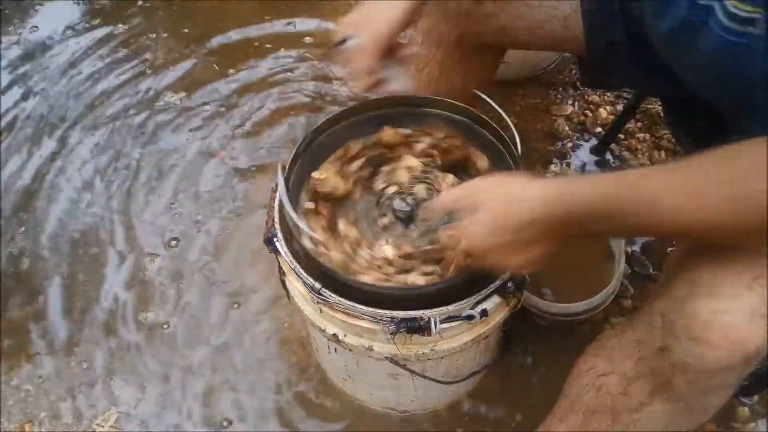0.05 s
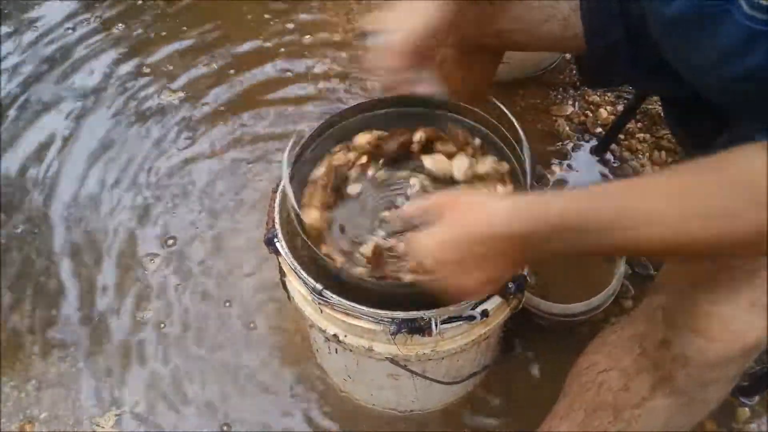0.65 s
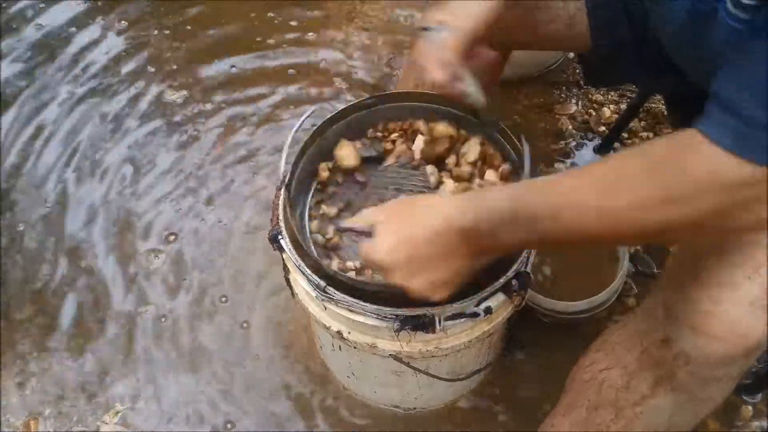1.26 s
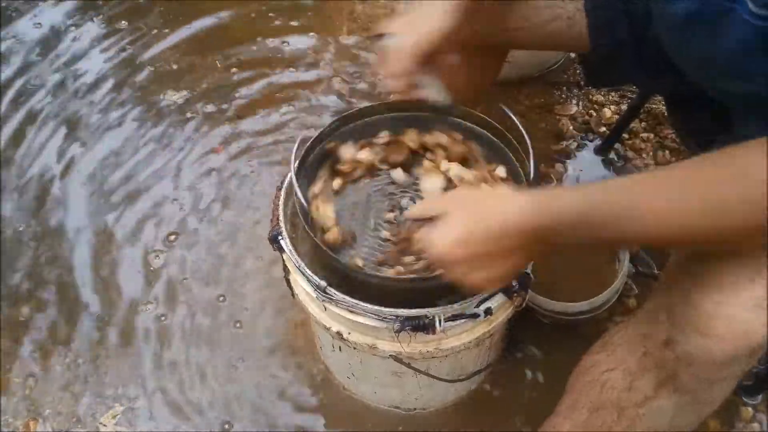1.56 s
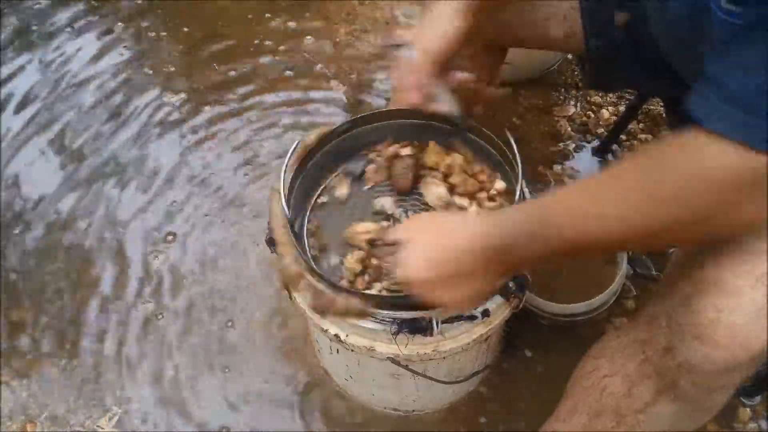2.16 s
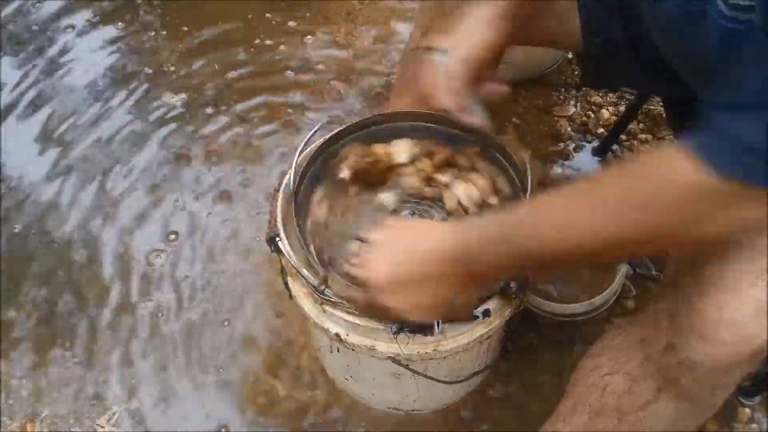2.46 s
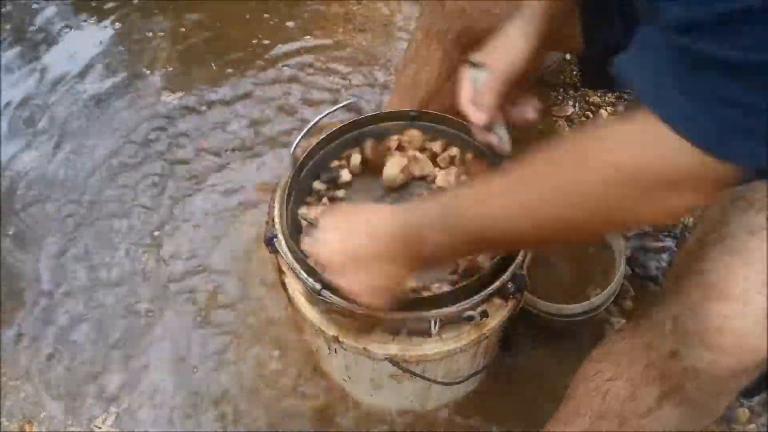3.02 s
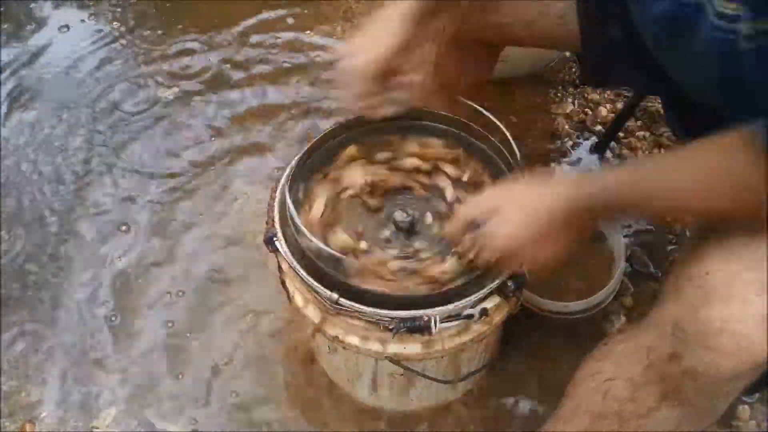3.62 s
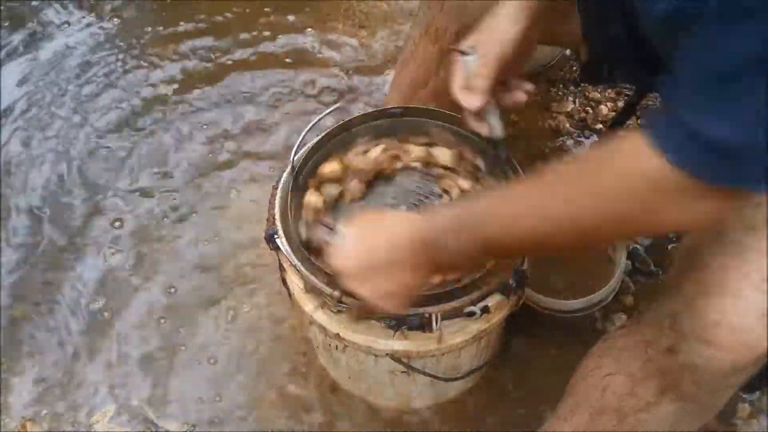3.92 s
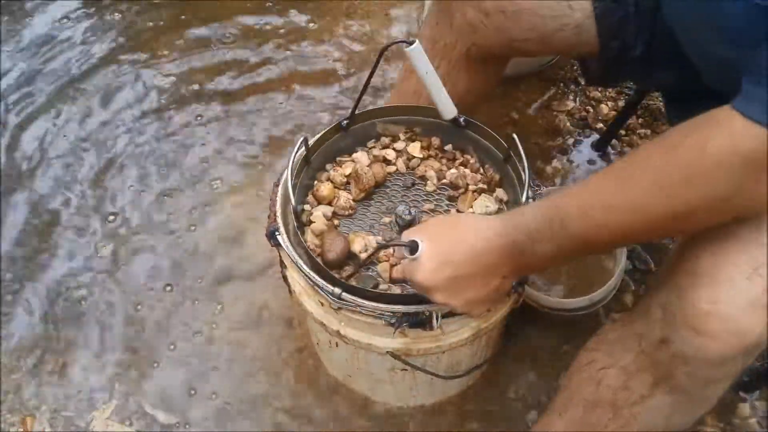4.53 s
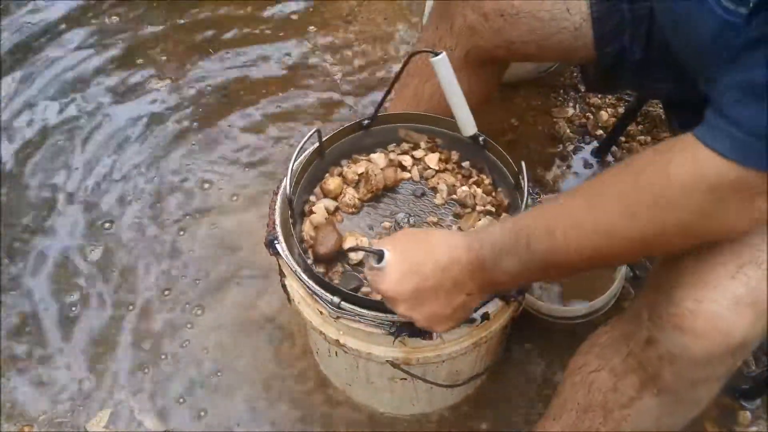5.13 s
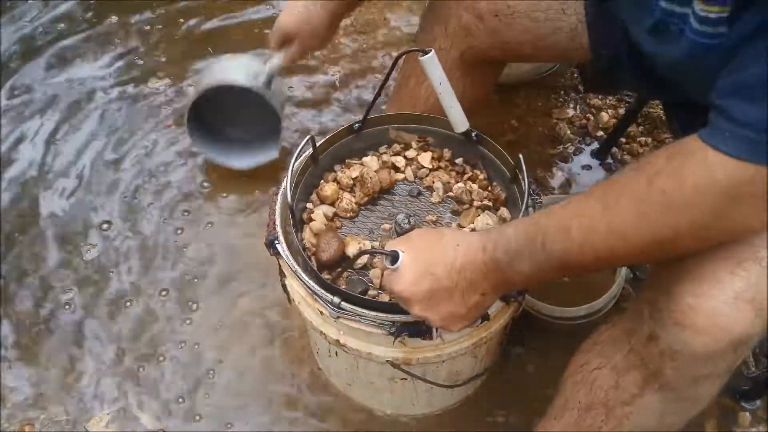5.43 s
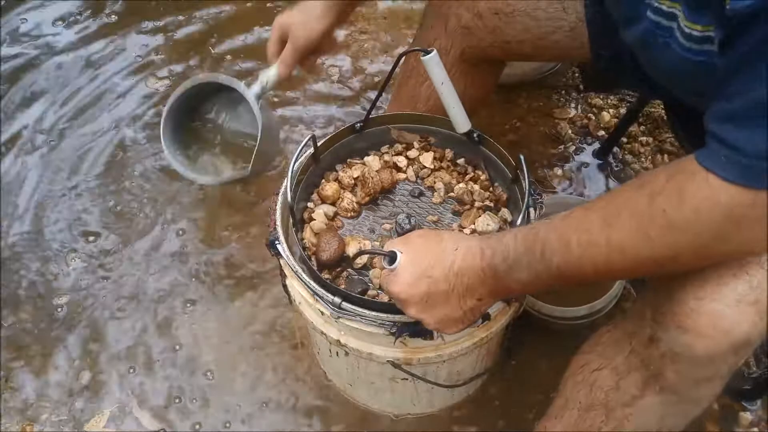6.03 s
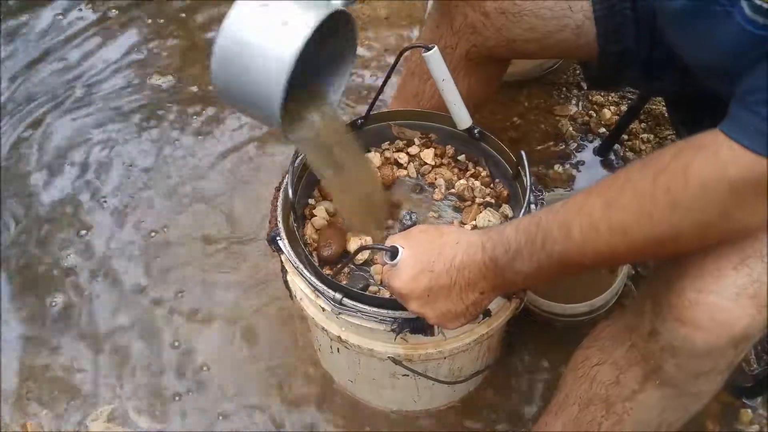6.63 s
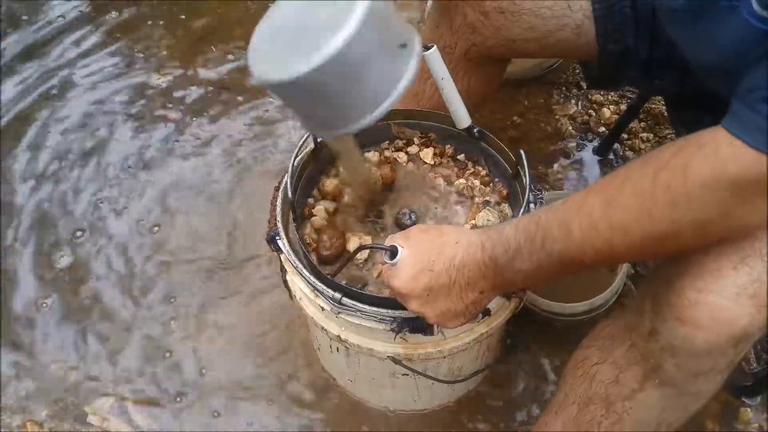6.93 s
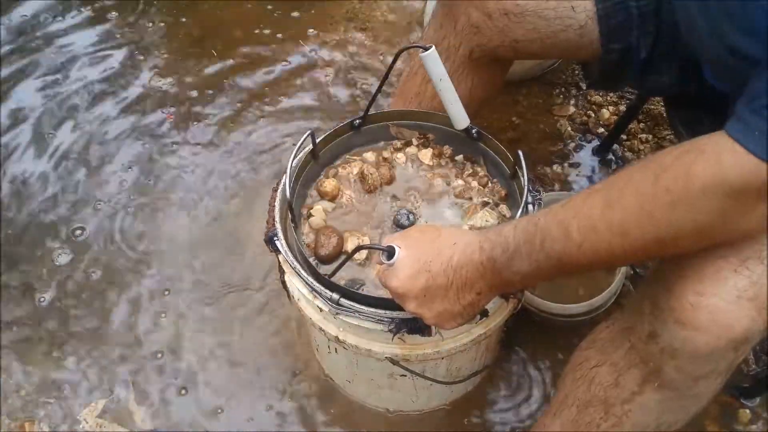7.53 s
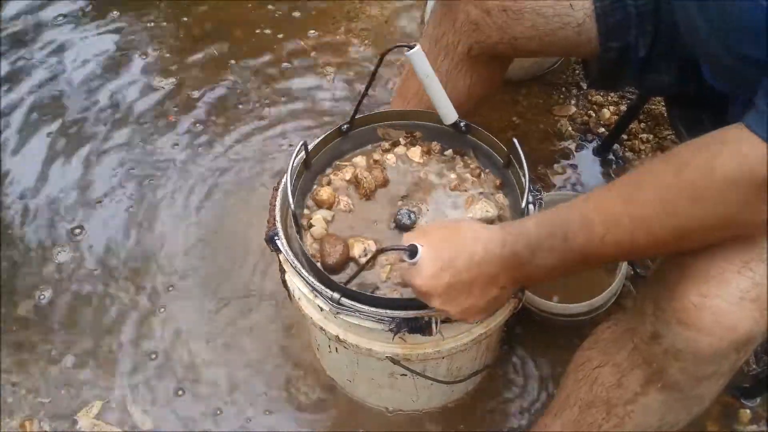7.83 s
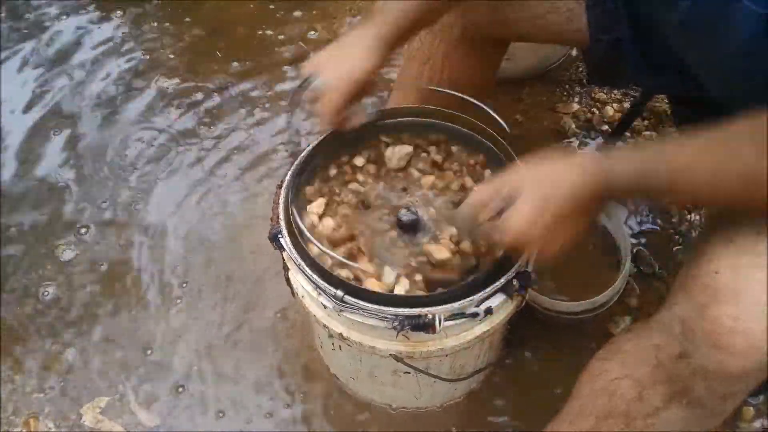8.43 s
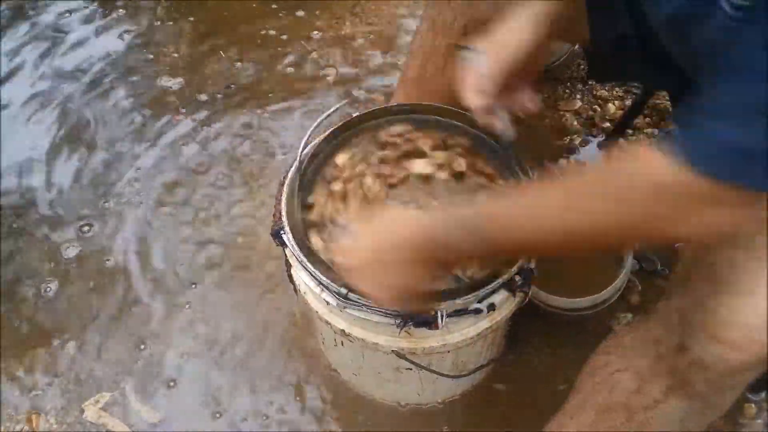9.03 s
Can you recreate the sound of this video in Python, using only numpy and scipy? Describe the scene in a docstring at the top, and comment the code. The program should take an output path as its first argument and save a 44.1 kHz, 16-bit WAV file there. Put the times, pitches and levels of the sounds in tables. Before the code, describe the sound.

Close by, beside a faintly washing creek, stones skitter around a mesh pan in quick pushes while water sloshes and booms softly in the bucket underneath. About halfway the spinning stops, leaving trickles, gritty crackles and light bumps. A small scooping splash leads to a brief pour spattering on the rocks. After a sharp metal scrape and some knocks, the gravel spins again with heavier churning.

```python
"""In a shallow creek, wet gravel is spun in a sieve pan that sits on a bucket of water.
With each push the stones rattle on the mesh while the water churns below. The pan stops and drips.
A saucepan scoops up water and pours it over the stones, the wire handles scrape and clank,
and the spinning starts again. The stones are many tiny clacks; the water is many ringing bubbles."""
import sys
import numpy as np
from scipy import signal
from scipy.fft import next_fast_len
from scipy.io import wavfile
from scipy.ndimage import uniform_filter1d

SR = 44100
rng = np.random.default_rng(int(sys.argv[2]) if len(sys.argv) > 2 else 0)


def master_out(mix):
    """Clip the mix to full scale and print it as 16-bit PCM to the path in sys.argv[1]."""
    frames = np.transpose(np.atleast_2d(mix))
    ceiling = np.clip(frames, -1, 1)
    pcm = np.round(ceiling * 32767).astype(np.int16)
    wavfile.write(sys.argv[1], SR, pcm)


N = 408807
TIME = np.arange(N) / SR

# The peaky treble tone shared by the rattle, pour, drips and scrapes: f/Hz, level/dB
BRIGHT_TONE = [(1200, -27.5), (2400, -24), (3500, -22.5), (4500, -11), (5400, -19), (6200, -9), (6900, -10),
               (7500, -4.5), (7800, -10), (8150, -1), (8550, -1.5), (9100, -11), (9900, -12), (13200, -21),
               (16000, -23.5)]
# The tone of the dull pan and of the deep water: f/Hz, level/dB
PAN = [(50, -23), (150, -20), (400, -8), (730, 0), (860, -7.5), (1020, 5), (1250, -5.5), (1700, -2),
       (2200, -12), (3200, -7), (7000, -48.5)]
WATER = [(40, -17), (140, -23.5), (220, -11.5), (330, 3), (500, 1.5), (750, -5.5), (1500, -47.5)]
# Pushes of the hand that spin the pan: start/s, length/s, level/dB
PUSHES = [(-0.072, 0.04, -10), (0.087, 0.36, -16.5), (0.479, 0.4, -17.5), (0.893, 0.44, -17.5),
          (1.354, 0.38, -18), (1.834, 0.14, -20), (2.072, 0.022, -11.5), (2.218, 0.2, -18),
          (2.446, 0.13, -14), (2.674, 0.14, -13.5), (2.894, 0.15, -13), (3.139, 0.19, -14),
          (3.381, 0.13, -13.5), (3.616, 0.17, -15), (3.874, 0.13, -14), (4.112, 0.1, -24),
          (8.375, 0.066, -14.5), (8.537, 0.13, -10), (8.796, 0.16, -11.5), (9.051, 0.075, -9)]
# The pan bumping the bucket: t/s, level/dB, f/Hz, t60/s (t60 is the time to fade by 60 dB)
KNOCKS = [(3.42, -11, 750, 0.05), (3.845, -5, 750, 0.052), (4.276, -20.5, 1200, 0.09),
          (4.321, -20, 1600, 0.06), (4.402, -28, 1500, 0.04), (4.596, -16.5, 1700, 0.085),
          (4.659, -13, 1500, 0.08), (4.841, -25.5, 1100, 0.03), (4.933, -30.5, 1500, 0.051),
          (5.288, -34, 735, 0.092), (7.969, -23.5, 850, 0.12), (7.969, -30, 160, 0.11),
          (8.058, -21, 790, 0.14), (8.143, -12, 870, 0.079), (8.148, -26.5, 200, 0.1),
          (8.512, -4.5, 1170, 0.041), (8.976, -7.5, 795, 0.11), (9.0, -6, 810, 0.12)]
FLOODED_S = 7.33  # from here on, the poured water covers the mesh


def amp(db):
    """Turns decibels into a gain to multiply by."""
    return 10 ** (np.asarray(db) / 20)


def unit(x):
    """Scales a sound to an average power of 1."""
    return x / np.sqrt(np.mean(x ** 2) + 1e-20)


def add(mix, s, sound):
    """Mixes a sound in, starting at s seconds."""
    part = mix[max(round(s * SR), 0):][:len(sound)]
    part += sound[:len(part)]


def envelope(start, rise_s, length_s, fade_db_per_s):
    """A gain that rises from the start, then fades once the length has passed."""
    t = TIME - start
    return np.clip(t / rise_s, 0, 1) * amp(-fade_db_per_s * np.maximum(t - length_s, 0))


def swell(crest, rise_db_per_s, fall_db_per_s):
    """A gain that climbs to 1 at the crest and falls away."""
    return amp(-np.maximum(rise_db_per_s * (crest - TIME), fall_db_per_s * (TIME - crest)))


def stroke(rise_s, t60):
    """A short slide: the times around its peak, and how hard it presses at each."""
    t = np.arange(-SR // 8, SR // 2) / SR
    return t, np.exp(np.minimum(t, 0) / rise_s - np.log(1000) * np.maximum(t, 0) / t60)


def colour(x, spectrum):
    """Gives a sound the tone in a table, at power 1, while clicks keep their sharp start."""
    hz, db = np.transpose(spectrum)
    grid_hz = abs(np.fft.fftfreq(4096, 1 / SR))
    log_gain = np.log(amp(np.interp(np.log1p(grid_hz), np.log1p(hz), db)))
    taps = np.fft.ifft(np.exp(np.conj(signal.hilbert(log_gain)))).real  # a minimum-phase filter
    return unit(signal.oaconvolve(x, taps[:len(taps) // 2])[:len(x)])


def ring(x, hz, width_hz):
    """Makes a sound ring at one pitch; the narrower the width, the longer it rings."""
    sharpness = hz / min(width_hz, .3 * SR)
    return signal.lfilter(*signal.iirpeak(min(hz, .45 * SR), sharpness, SR), x)


def waver(x, depth_hz, every_s):
    """Lets the pitch of a sound wander at random."""
    times = np.arange(0, N / SR + every_s, every_s)
    shift_hz = np.interp(TIME, times, rng.standard_normal(1000)[:len(times)]) * depth_hz
    return (signal.hilbert(x, next_fast_len(N))[:N] * np.exp(2j * np.pi * np.cumsum(shift_hz) / SR)).real


def soften(x):
    """Water cushions the start of a sound."""
    return x * (1 - np.exp(-np.arange(len(x)) / (.002 * SR)))


def clicks(per_s, spread_db):
    """Clicks at random moments, mostly small and a few large."""
    place, chance = rng.random((6000, 2))[:int(per_s * N / SR)].T
    out = np.zeros(N)
    out[(place * N).astype(int)] = amp(spread_db * np.minimum(-np.log(chance), 3.6))
    return out


def clack(hz, width, t60, scatter):
    """One hit: a click scatters off nearby stones and rings what it struck. Width is a share of hz."""
    t = np.arange(int(t60 * SR) + 64) / SR
    blow = scatter * rng.standard_normal(SR // 2)[:len(t)] * amp(-60 * t / t60)
    blow[0] += 1
    return ring(blow, hz, width * hz)


def shower(low_hz, high_hz, per_s, spread_db, width, t60, scatter, count=14):
    """Many clacks of many pitches, each with a short noisy tail."""
    out = np.zeros(N)
    decay = amp(-120 / (t60 * SR))  # share of a tail's power left after one sample
    for hz in np.geomspace(low_hz, high_hz, count):
        hits = clicks(per_s / count, spread_db)
        tails = np.sqrt(signal.lfilter([1], [1, -decay], hits ** 2 + 1e-12)) * rng.standard_normal(N)
        out += np.sqrt(hz) * unit(ring(hits + scatter * tails, hz, width * hz))
    return unit(out)


def bubble(hz, t60, rise):
    """A fading tone whose pitch climbs, as a bubble's does when it nears the surface."""
    t = np.arange(int(t60 * SR) + 8) / SR
    tone = np.sin(2 * np.pi * hz * t * (1 + rise * t / t60))
    return tone * amp(-60 * t / t60) * (1 - np.exp(-t * hz))


def bubbling(low_hz, high_hz, per_s, spread_db, cycles, count=30):
    """Many bubbles of many sizes; the big, low ones ring longest."""
    out = np.zeros(N)
    for hz in np.geomspace(low_hz, high_hz, count):
        births = clicks(per_s / count, spread_db)
        out += np.sqrt(hz) * signal.oaconvolve(births, bubble(hz, cycles / hz, rise=0.081))[:N]
    return unit(out)


def body(x):
    """The pan on its bucket answers a blow by ringing at several pitches."""
    # Those pitches: f/Hz, width/Hz, level/dB
    resonances = [(350, 110, 1), (1145, 280, -1.5), (1538, 100, -6.5), (2186, 110, -4), (2950, 360, 0),
                  (4520, 420, 3)]
    return sum(amp(db) * ring(x, hz, width) for hz, width, db in resonances)


def creek():
    """Shallow water makes a faint, steady wash."""
    # Its tone: f/Hz, level/dB
    wash = [(25, -19), (68, 2.5), (130, -8.5), (520, -15), (820, -4), (2000, -13), (3500, -24), (4600, 0.5),
            (5200, -11.5), (8300, -7), (10500, -19.5)]
    return amp(-59.5) * colour(rng.standard_normal(N), wash)


def bank_echo(near):
    """The creek banks scatter a little of the sound back."""
    t = np.arange(SR // 2) / SR
    banks = rng.standard_normal(len(t)) * amp(-60 * t / .24) * (t > .004)
    return amp(-19) * signal.oaconvolve(near, banks / np.linalg.norm(banks))[:N]


def ringing(sag=.04):
    """Thin metal rings after a touch, starting a little high and sinking in pitch."""
    # The saucepan (picked up, dipped, tipped), then a wire handle: t/s, level/dB, f/Hz, t60/s
    touches = [(5.292, -46, 1190, 0.35), (5.674, -28.5, 3120, 0.078), (6.419, -53.5, 1215, 2.8),
               (8.145, -29, 3460, 0.16)]
    out, t = np.zeros(N), np.arange(SR // 2) / SR
    for s, db, hz, t60 in touches:
        fade = amp(-60 * t / t60)
        pitch = hz * (1 + sag * np.sqrt(fade))
        add(out, s, amp(db) * fade * np.sin(2 * np.pi * np.cumsum(pitch) / SR))
    return out


def squeaking(at_s=4.803, pitch_hz=1178, jitter=.012):
    """A handle sticks and slips in its loop: a quick, unsteady run of jolts with grit in it."""
    out = np.zeros(N)
    t, pressure = stroke(rise_s=.008, t60=.05)
    hz = pitch_hz * (1 + jitter * unit(uniform_filter1d(rng.standard_normal(len(t)), 40)))
    jolts = unit(sum(np.cos(2 * np.pi * k * np.cumsum(hz) / SR) for k in range(2, 10)))
    rough = jolts + .8 * rng.standard_normal(len(t))
    add(out, at_s + t[0], amp(-27.5) * pressure * (colour(rough, BRIGHT_TONE) + jolts / 3))
    return out


def scooping():
    """The saucepan splashes out of the creek in a burst of tiny bubbles."""
    splash = amp(-38) * envelope(start=6.137, rise_s=0.011, length_s=0.011, fade_db_per_s=147)
    return splash * bubbling(2820, 9000, per_s=1800, spread_db=4, cycles=24)


def pouring():
    """Poured water spatters on the stones, froths, and makes the air in the bucket ring."""
    spatter = shower(417, 10100, per_s=6200, spread_db=7.5, width=0.16, t60=0.039, scatter=0.17)
    froth = amp(-10) * bubbling(850, 7700, per_s=1100, spread_db=0.5, cycles=17)
    air = amp(-9.5) * unit(ring(ring(spatter, 707, 100), 707, 100))
    dull = amp(-17) * colour(spatter, PAN) + amp(-21) * colour(spatter, WATER)
    stream = amp(-39.5) * envelope(start=6.82, rise_s=.04, length_s=0.45, fade_db_per_s=260)
    return stream * (colour(spatter, BRIGHT_TONE) + dull + froth + air)


def draining(stop_s=4.25):
    """The stopped pan drains: wet grit crackles, drops raise small bubbles, and the bucket gurgles."""
    grit = shower(1600, 7900, per_s=520, spread_db=4.2, width=1.0, t60=0.027, scatter=0.3)
    snaps = bubbling(3650, 10400, per_s=130, spread_db=7.5, cycles=65)
    drips = bubbling(1170, 3250, per_s=61, spread_db=5.0, cycles=60)
    gurgle = bubbling(121, 1440, per_s=300, spread_db=5, cycles=15)
    emptying = envelope(stop_s, rise_s=.08, length_s=FLOODED_S - stop_s, fade_db_per_s=84)
    rush = envelope(stop_s, rise_s=.08, length_s=0, fade_db_per_s=14)
    trickle, stray_drops = amp(-54.5), amp(-11)  # faint stray drops fall the whole time
    flow = emptying * (amp(-37.5) * rush + trickle)
    # Each bump shakes some grit loose.
    shaken = sum(amp(db - 19.5) * envelope(s, 0.0088, 0, fade_db_per_s=125) for s, db, _, _ in KNOCKS)
    crackle = amp(-4) * colour(grit, BRIGHT_TONE) + amp(-11) * colour(grit, PAN)
    drops = (flow + stray_drops * trickle) * amp(-5.5) * colour(snaps, BRIGHT_TONE)
    drops += (emptying + stray_drops) * amp(-60) * drips
    return (flow + shaken) * crackle + drops + amp(-49) * rush ** 1.5 * colour(gurgle, WATER)


def ticking():
    """Single stones settle and drops land, each with a sharp tick."""
    # The ticks: t/s, level/dB, f/Hz
    ticks = [(2.0146, -8, 8800), (4.3172, -5, 8100), (4.402, -17.5, 7500), (4.57, -18, 6500),
             (4.879, -26.5, 6800), (5.1575, -18, 6560), (5.2952, -17, 8750), (5.674, -11, 7440),
             (5.736, -22.5, 6600), (5.8451, -21.5, 5870), (6.1492, -28, 3560), (6.367, -23.5, 4550),
             (6.621, -29, 6560), (6.77, -26.5, 4500), (7.1386, -16.5, 8100), (7.361, -29, 6250),
             (7.412, -26.5, 8040), (8.3696, -11, 6730)]
    out = np.zeros(N)
    for s, db, hz in ticks:
        tick = ring(clack(hz, width=.2, t60=.022, scatter=.2), hz, hz)
        add(out, s, amp(db) * tick / abs(tick).max())
    return out


def hollow_tones():
    """Short hollow tones: booms of the bucket and single bubbles, each with a faint burst of noise."""
    # The tones: t/s, level/dB, f/Hz, t60/s
    tones = [(0.83, -18, 697, 0.12), (0.855, -17.5, 1050, 0.15), (1.57, -16.5, 736, 0.097),
             (1.72, -18.5, 756, 0.11), (2.54, -9.5, 420, 0.039), (2.58, -12, 322, 0.046),
             (2.818, -7, 322, 0.061), (4.492, -25, 590, 0.2), (4.774, -31, 2050, 0.057),
             (5.725, -32, 2110, 0.064), (5.817, -40, 456, 0.12), (6.011, -28.5, 652, 0.084),
             (6.594, -24.5, 763, 0.09), (9.005, -7, 796, 0.093), (9.22, -9, 458, 0.044)]
    out = np.zeros(N)
    for s, db, hz, t60 in tones:
        add(out, s, amp(db) * soften(bubble(hz, t60, rise=0.104)))
        add(out, s, amp(db - 20) * soften(clack(hz, width=1.5, t60=t60, scatter=.8)))
    return out


def knocking():
    """The pan bumps the bucket: a dull thud, and both of them ring."""
    out = np.zeros(N)
    for s, db, hz, t60 in KNOCKS:
        blow = clack(hz, width=0.85, t60=t60, scatter=0.93)
        knock = soften(ring(blow, hz, 2 * hz) + amp(4) * body(blow))
        add(out, s, amp(db) * knock / abs(knock).max())
    return out


def scraping():
    """The handles scrape in their loops, which leaves the steel wire ringing."""
    # The scrapes: t/s, level/dB, rise/s, t60/s, ring compared with scrape/dB
    scrapes = [(8.06, -9, 0.0029, 0.059, -13), (8.145, -24.5, 0.011, 0.093, -0.5),
               (8.21, -35, .002, 0.12, 6), (8.52, -15.5, 0.0053, 0.02, -17)]
    # The pitches of the wire: f/Hz, level/dB
    wire = [(5280, -6), (6340, 4), (7090, 9), (7280, 2), (7520, 5), (8500, 0), (8900, 2)]
    out = np.zeros(N)
    for s, db, rise, t60, ring_db in scrapes:
        t, pressure = stroke(rise, t60)
        slips = pressure * colour(rng.standard_normal(len(t)), BRIGHT_TONE)
        jolts = pressure * rng.standard_normal(len(t))
        steel = sum(amp(level) * ring(jolts, hz, width_hz=16) for hz, level in wire)
        add(out, s + t[0], amp(db) * (slips + amp(ring_db) * slips.std() * unit(steel)))
    return out


def grinding():
    """The pan grinds on the bucket's rim as it starts to turn."""
    # The rubs: t/s, level/dB, rise/s, t60/s, f/Hz
    grinds = [(8.374, -29.5, .011, .06, 1850), (8.485, -23, .025, .2, 1100)]
    out = np.zeros(N)
    for s, db, rise, t60, hz in grinds:
        t, pressure = stroke(rise, t60)
        rub = ring(rng.standard_normal(len(t)), hz, hz / 4)
        add(out, s + t[0], amp(db) * pressure * unit(body(rub)))
    return out


def sloshing(rattle):
    """Water churns along with the stones, and waves slap under the mesh."""
    # The tops of the waves: t/s, level/dB
    waves = [(0.34, -32.5), (0.74, -32.5), (1.7, -34.5), (2.38, -33.5), (2.57, -31), (2.88, -29.5),
             (3.38, -27.5), (4.05, -33.5), (8.69, -29.5), (9.2, -20.5)]
    slaps = sum(amp(db) * swell(s, rise_db_per_s=167, fall_db_per_s=131) for s, db in waves)
    churn = amp(-24.5) * rattle
    gurgle = bubbling(120.4, 1386, per_s=500, spread_db=4.0, cycles=8.9)
    return np.hypot(churn, slaps) * colour(gurgle, WATER)


def booming(tumble, water_risen_s=1.59):
    """Air in the bucket rings, most just before each push ends, and fades once the water has risen."""
    air = waver(unit(ring(ring(tumble, 717, 145), 717, 145)), depth_hz=20, every_s=.15)
    swells = sum(amp(db) * swell(s + length - 0.065, rise_db_per_s=75, fall_db_per_s=118)
                 for s, length, db in PUSHES)
    return air * swells * amp(-10.5 - 56.5 * np.maximum(TIME - water_risen_s, 0))


def pebbles(per_s, spread_db, cycles, count=44):
    """Larger pebbles ring briefly when they collide, each at its own pitch."""
    t = np.arange(SR // 30) / SR
    pitches = np.geomspace(1300, 11000, count) * rng.uniform(.98, 1.02, count)
    turns = np.outer(pitches, t)
    tones = np.sqrt(pitches[:, None]) * np.sin(2 * np.pi * turns) * amp(-60 * turns / cycles)
    return unit(sum(signal.oaconvolve(clicks(per_s / count, spread_db), tone)[:N] for tone in tones))


def motion(spin_up_s=.08, coast_db_per_s=70, grip_db=-33):
    """How hard the stones move: pushes add up, and below grip_db friction holds the stones still."""
    power = sum((amp(db) * envelope(s, spin_up_s, length, coast_db_per_s)) ** 2
                for s, length, db in PUSHES)
    return np.sqrt(np.maximum(power - amp(grip_db) ** 2, 0))


def spinning(wet_cutoff_hz=7700):
    """Stones skitter on the mesh, shake the pan and the air under it, and stir the water."""
    rattle = motion()
    skitter = shower(1500, 14000, per_s=2600, spread_db=2.5, width=0.64, t60=0.062, scatter=0.16)
    tumble = shower(199, 3980, per_s=1300, spread_db=3.0, width=0.39, t60=0.054, scatter=0.18)
    skitter += amp(-4) * pebbles(per_s=1400, spread_db=2.8, cycles=45)
    bright = colour(skitter, BRIGHT_TONE)
    dulled = signal.lfilter(*signal.butter(1, wet_cutoff_hz, fs=SR), bright)
    stones = rattle * np.where(TIME > FLOODED_S, dulled, bright)  # water over the mesh dulls them
    water = sloshing(rattle)
    air = booming(tumble)
    thumps = amp(-7) * unit(ring(body(clicks(per_s=60, spread_db=3)), 900, 900))
    rumble = amp(-29.5) * np.tanh(rattle / amp(-16.5))  # levels off in the hard pushes
    return stones + rumble * (colour(tumble, PAN) + thumps) + air + water


def scene():
    """The work at the pan, its faint echo and the creek, in one channel."""
    near = spinning() + draining() + scooping() + pouring() + ticking() + hollow_tones()
    near += knocking() + scraping() + grinding() + squeaking() + ringing()
    return (near + bank_echo(near) + creek())[None]


def record(dry, top_hz=15750):
    """Gently rounds the peaks, dips three narrow bands and cuts the highest treble."""
    # The dips in the tone: f/Hz, width/Hz
    notches = [(595, 89), (1875, 85), (2475, 196)]
    dry = .8 * np.tanh(dry / .8)
    for hz, width in notches:
        dry = dry - ring(dry, hz, width)
    low_pass = signal.firwin(611, top_hz, window=("kaiser", 8), fs=SR)
    return signal.oaconvolve(dry, low_pass[None], "same")


dry = scene()
out = record(dry)
master_out(out)
```